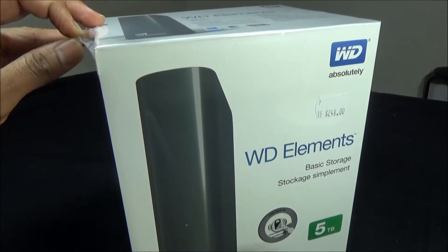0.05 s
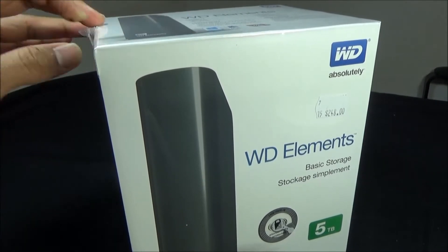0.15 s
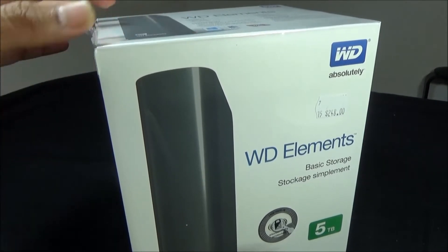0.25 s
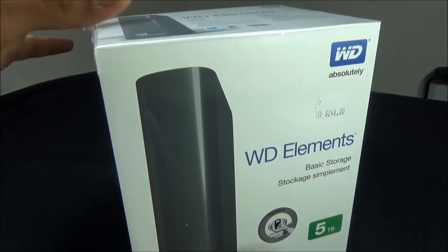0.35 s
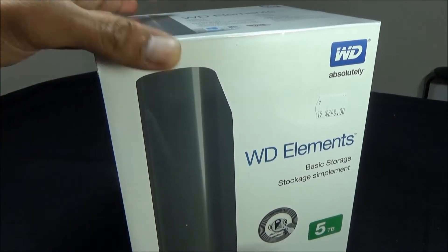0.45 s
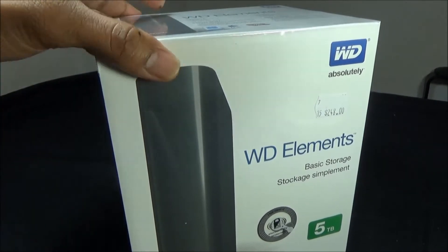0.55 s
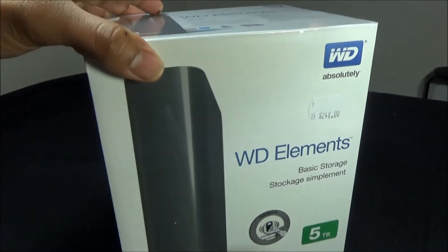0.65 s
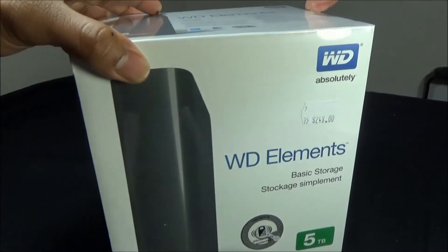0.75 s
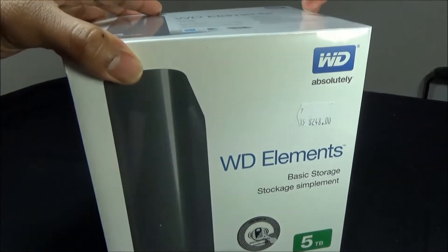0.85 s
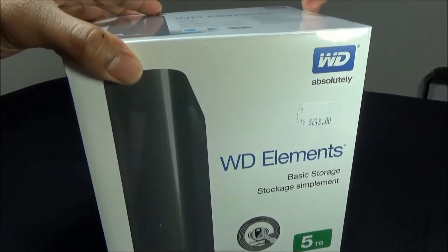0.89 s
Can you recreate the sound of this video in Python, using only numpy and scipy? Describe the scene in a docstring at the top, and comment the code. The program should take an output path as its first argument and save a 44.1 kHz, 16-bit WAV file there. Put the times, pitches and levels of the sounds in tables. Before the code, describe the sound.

A craft knife slider ratchets through about six sharp, quick clicks from 0.2 to 0.4 seconds, after a soft rub and bump. Hands slide over a plastic-wrapped cardboard box, which knocks hollowly at 0.6 seconds. Lighter bumps and plastic snaps follow until 0.9. Faint rustling and tiny squeaks lead to one more knock at 1.4 seconds. Everything is close, in a small room with faint hum and hiss.

```python
"""In a small room, close by, the slider of a craft knife is pulled back over six detents.
At each the blade chatters, seats and rings in its free modes. The knife is put down; hands slide over a
film-wrapped cardboard box, grip it and rock it on a cloth-covered table. Impacts excite the damped modes
of the box, while friction makes it rumble, scrape and groan, and the film hisses, squeaks and snaps.
Under it all lie a low hum, faint hiss and a very faint pulsing chirp."""
import sys
import numpy as np
from scipy import signal
from scipy.fft import rfft, irfft
from scipy.io import wavfile
from scipy.ndimage import uniform_filter1d

SR = 44100
rng = np.random.default_rng(int(sys.argv[2]) if len(sys.argv) > 2 else 0)


def wav_out(sig):
    """Save sig, one row per channel (or a flat mono array), as 16-bit PCM at SR to the path in sys.argv[1]."""
    wavfile.write(sys.argv[1], SR, np.round(np.clip(np.atleast_2d(sig).T, -1, 1) * 32767).astype(np.int16))


N = 74970

# spectrum of the room air: f/Hz, level/dB
AIR_SPECTRUM = [(20, -17.5), (55, 6), (110, -1.5), (200, -10.5), (1200, -9), (2500, -16.5), (5000, -19),
                (10000, -27), (16000, -23.5)]
# left-right coherence of hiss and rubbing: f/Hz, coherence (0-1)
HISS_COHERENCE = [(100, 1), (400, 0.91), (1000, 0.39), (2500, 0.52), (5000, 0.72), (8500, 0.87), (11000, 1),
                  (15000, 0.99)]
# reverberation bands: f/Hz, T60/s, level/dB, left-right coherence (0-1)
ROOM_BANDS = [(101, 0.39, -1, 0.99), (378, 0.32, -1.5, 0.96), (960, 0.29, 3.5, 0.97), (2470, 0.32, 2, 0.73),
              (5000, 0.3, 4.5, 0.67), (8300, 0.28, 1, 0.72), (13200, 0.23, 1.5, 1)]
# lingering resonances of table and room: f/Hz, T60/s, level/dB
TABLE_MODES = [(384, 0.41, -54.5), (560, 0.18, -58), (820, 0.17, -48.5)]

# friction of the box on hand and cloth: t/s, rumble level/dB, scrape level/dB
RUB_LEVELS = [(0, -39.5, -46), (.08, -41.5, -43), (.14, -48.5, -50.5), (.3, -55, -60.5),
              (.39, -58.5, -56.5), (.44, -47, -51), (.51, -50, -46), (.56, -50, -42.5), (.62, -52, -38.5),
              (.7, -46.5, -52.5), (.82, -52, -44), (.92, -60, -59.5), (1, -62.5, -61), (1.37, -62, -74.5),
              (1.46, -55, -51.5), (1.56, -57.5, -60.5), (1.64, -58.5, -52), (1.7, -58, -77)]
# rumble of the hollow box: f/Hz, level/dB
RUMBLE_SPECTRUM = [(30, -43), (80, -5.5), (130, -1), (200, 3), (300, -6), (700, -48), (16000, -80)]
# scrape of the box: f/Hz, level/dB
SCRAPE_SPECTRUM = [(100, -10), (300, 1.5), (600, 2.5), (900, -6), (1700, -12.5), (3000, -12.5),
                   (16000, -50)]
# soft heaves of the table: t/s, duration/s, level/dB
TABLE_HEAVES = [(0, 0.23, -47), (0.37, 0.075, -45), (1.395, 0.17, -49.5), (1.54, 0.27, -47)]
# harmonics of the groan, fundamental first: level/dB
GROAN_HARMONICS = [3, -2.5, -6, -7.5]

# skin sliding on the film: t/s, level/dB
SLIDE_LEVELS = [(0, -42.5), (.07, -39.5), (.12, -45), (.19, -46.5), (.45, -47), (.54, -41.5), (.61, -37.5),
                (.68, -42.5), (.74, -53), (.9, -50), (.96, -55.5), (1.03, -49.5), (1.12, -53.5),
                (1.18, -50), (1.23, -58.5), (1.34, -59), (1.39, -45.5), (1.45, -54.5), (1.5, -51.5),
                (1.55, -58.5), (1.61, -62), (1.645, -54.5), (1.7, -67)]
# hiss of the film: f/Hz, level/dB
FILM_SPECTRUM = [(300, -25), (1200, -7), (2200, -2), (4500, -3), (7000, -3), (9500, 1), (11000, -3),
                 (12500, -11.5), (16000, -22)]
# snaps of the film: t/s, level/dB, centre f/Hz, time constant/s, relative hiss level/dB
FILM_SNAPS = [(0.052, -40, 4402, 0.0016, 12.5), (0.6005, -32.5, 5000, 0.0019, 7.5),
              (0.7264, -45, 3200, 0.0013, 5), (0.806, -45, 3200, 0.0019, -7),
              (0.8568, -25.5, 5350, 0.002, -0.5), (1.109, -46, 3670, 0.0032, 1),
              (1.4147, -36, 2770, 0.001, -3)]
# fingertip squeaks on the film: t/s, duration/s, f/Hz, relative half-width, level/dB
FILM_SQUEAKS = [(.99, .08, 13500, .16, -57), (1.147, .037, 5360, 0.073, -54),
                (1.35, 0.021, 2130, 0.018, -50.5), (1.361, 0.051, 4620, .06, -53),
                (1.384, 0.01, 3200, .14, -44)]

# modes of the box before the hand damps and retunes them: f/Hz, T60/s, level/dB
BOX_MODES = [(116, 0.12, -2), (183, 0.064, -6), (300, 0.023, -2.5), (372.7, 0.048, 0), (581.5, 0.073, -3.5),
             (672, 0.033, -1), (807, 0.032, -4), (1000, 0.037, -4), (1422, 0.042, -4), (1710, 0.032, -4),
             (1900, 0.034, -6), (2130, .025, -10)]
# dull crush of the card: f/Hz, level/dB
CRUSH_SPECTRUM = [(100, -10), (500, 1.5), (1950, -5), (2500, -9.5), (5000, -14), (16000, -56)]
# points at which the spectrum of a knock is given: f/Hz
KNOCK_BANDS = [120, 380, 555, 800, 1050, 1700]
# knocks on box and table: t/s, level/dB in each of the six KNOCK_BANDS, T60 ratio, frequency ratio,
# relative crush level/dB, gain into room and table/dB
BOX_KNOCKS = [(.088, -33, -55, -41, -52, -40, -27.5, 0.24, 1.02, 1, -3),
              (.1968, -43, -18, -20.5, -21, -23.5, -15, 0.34, 0.96, -3, -8.5),
              (.573, -32, -38, -25.5, -39, -50, -54, 0.27, 1.16, 1.5, 0),
              (.5808, -32, -15.5, -16.5, -14, -20.5, -14.5, 0.35, 1.02, -2.5, -2),
              (.588, -38, -39, -21.5, -18, -47, -33, 0.49, 1.09, -9.5, -1),
              (0.7203, -34, -20.5, -19.5, -34, -28, -40, 0.53, 0.986, -18, -14.5),
              (0.769, -54, -30.5, -30.5, -17.5, -25, -24.5, 0.53, 1.01, -13, -25),
              (0.7957, -30, -23.5, -29, -20, -35, -33, 0.67, 0.948, -4, -20),
              (.8059, -36, -20.5, -50, -36, -21.5, -42, 0.36, 0.98, -2.5, -27),
              (0.8585, -22.5, -26, -29, -41, -36, -39.5, 0.71, 1.064, 4, -10.5),
              (1.4149, -28, -13.5, -30.5, -16, -30, -31.5, 0.8, 1.053, -7, -10)]

# fixed modes of blade and handle: f/Hz, T60/s, level/dB
KNIFE_MODES = [(1593, 0.0063, -12.5), (2240, .012, -20.5), (2870, 0.0056, -18), (4656, 0.016, -6),
               (6110, 0.0066, -5), (7500, 0.011, -12), (9640, 0.0098, 1), (12500, 0.01, -2.5),
               (13400, .012, -19)]
# rattle of the blade in its track: f/Hz, level/dB
RATTLE_SPECTRUM = [(300, -32), (900, -18.5), (1300, -19), (1900, -7), (3500, -2), (6000, -1.5), (8000, 3),
                   (10500, 1.5), (13000, -2.5), (16000, -8.5)]
# part of the rattle that differs between left and right: f/Hz, gain/dB
RATTLE_SPREAD = [(500, -17), (2500, -2.5), (5000, -5), (9000, -4), (13000, -12.5)]
# slider clicks, two at the last detent: t/s, level/dB, chatter duration/s, seating delay/s, then
# f/Hz, level/dB for each of four modes set by the free length of blade (low, ping, upper, bright)
DETENT_CLICKS = [(0.2051, -16.5, 0.005, .0025, 2597, 0.5, 4330, -2, 7550, 1, 10370, 5.5),
                 (0.236, -17, 0.005, 0.0024, 2650, 3.5, 4055, 1.5, 7000, 0.5, 8420, 7),
                 (0.2659, -18, .0044, .0022, 2646, 6, 3990, -6, 7350, 0, 9380, 1),
                 (0.3001, -18, .0052, .0022, 2563, 3, 4250, 5.5, 7350, 6, 9020, 8),
                 (0.3339, -17, 0.0044, 0.00046, 2580, 4, 4225, 2.5, 10450, 6, 9030, 7.5),
                 (0.3925, -17, 0.00038, 0.00017, 2670, -25, 4300, -12, 8800, -6, 10400, -9),
                 (0.3978, -15.5, .0046, 0.0012, 2590, -2, 4220, -14, 8900, 4, 10570, 5.5)]
SLIDING_T60_S = (0.01, 0.018, 0.0039, 0.0039)  # of those four modes

TOP_HZ = 16000


def undb(db):
    """Amplitude ratio of a level in decibels."""
    return 10 ** (np.asarray(db) / 20)


def unit(x):
    """Normalisation to rms 1."""
    return x / np.sqrt(np.mean(x ** 2))


def since(start=0):
    """Seconds elapsed since an onset, 0 before it."""
    return np.maximum(np.arange(N) / SR - start, 0)


def swell(start, length):
    """Half-sine envelope."""
    return np.sin(np.pi * np.minimum(since(start) / length, 1))


def envelope(rows, column=1):
    """Amplitude over time, interpolated in decibels."""
    rows = np.array(rows)
    return undb(np.interp(since(), rows[:, 0], rows[:, column]))


def across(hz, rows, column=1):
    """Interpolation of a column over log frequency."""
    rows = np.array(rows)
    return np.interp(np.log(hz + 1), np.log(rows[:, 0]), rows[:, column])


def bins():
    """Frequencies of the spectrum in Hz."""
    return np.fft.rfftfreq(N, 1 / SR)


def colour(rows):
    """Magnitude response through points of f/Hz, level/dB."""
    return undb(across(bins(), rows))


def resonance(hz, half_width):
    """Lorentzian peak; centred on 0 Hz it is a low-pass."""
    return 1 / (1 + ((bins() - hz) / half_width) ** 2)


def filtered(x, gain):
    """Zero-phase filtering by a gain per frequency."""
    return irfft(rfft(x) * gain, N)


def noise(gain):
    """Spectrally shaped Gaussian noise of rms 1."""
    return unit(filtered(rng.standard_normal(N), gain))


def stereo_noise(gain, coherence=HISS_COHERENCE):
    """Partly coherent noise: sum and difference of two independent signals."""
    alike = np.clip(across(bins(), coherence, column=-1), 0, .999)
    mid = filtered(rng.standard_normal(N), gain * np.sqrt(1 + alike))
    side = filtered(rng.standard_normal(N), gain * np.sqrt(1 - alike))
    return unit(np.array([mid + side, mid - side]))


def decay(t, t60):
    """Exponential damping, 60 dB in t60 seconds."""
    return np.exp(-np.log(1000) * t / t60)


def mode(t, hz, t60):
    """Free vibration of a damped oscillator."""
    return np.sin(2 * np.pi * hz * t) * decay(t, t60)


def convolve(x, response):
    """Output of a linear system with the given impulse response."""
    return signal.fftconvolve(np.atleast_2d(x), np.atleast_2d(response))[:, :N]


def scatter(x, start, width_hz):
    """Radiation in all directions evens out fine peaks: a minimum-phase pulse of smoothed spectrum."""
    power = uniform_filter1d(np.abs(rfft(x)) ** 2, max(int(width_hz * N / SR), 1))
    cepstrum = irfft(np.log(np.maximum(power, 1e-9 * power.max())) / 2, N)
    causal = cepstrum * (1 + np.sign(np.fft.fftfreq(N)))
    return irfft(np.exp(rfft(causal) - 2j * np.pi * bins() * start), N)


def room(x):
    """Reverberation: a diffuse field decays exponentially, sooner in the treble."""
    t, build_s = since(0.00074), 0.00048
    diffuse = stereo_noise(bins() < TOP_HZ, ROOM_BANDS)
    log_centres = np.log([band[0] for band in ROOM_BANDS])
    tail = 0
    for k, (_, t60, db, _) in enumerate(ROOM_BANDS):
        band = np.interp(np.log(bins() + 1), log_centres, np.arange(len(ROOM_BANDS)) == k)
        tail += undb(db) * filtered(diffuse, band) * decay(t, t60)
    tail *= 1 - np.exp(-t / build_s)
    return convolve(x, unit(tail) / np.sqrt(N))


def background():
    """Superposition of broadband room air, a low hum and a faint, evenly pulsed tone."""
    hum_hz, chirp_hz = 52, 3200
    start, end, period_s, pulse_s = .8825, 1.34, .0401, 0.01
    t = since(start)
    pulses = np.sin(np.pi * np.minimum(t % period_s / pulse_s, 1)) * (since() < end)
    chirp = undb(-51) * pulses * np.sin(2 * np.pi * chirp_hz * t)
    hum = undb(-58) * np.sin(2 * np.pi * hum_hz * since())
    air = undb(-52.5) * stereo_noise(colour(AIR_SPECTRUM))
    return air + hum + chirp


def rubbing():
    """Sliding friction drives the hollow box with noise, and the table heaves under it."""
    rumble = envelope(RUB_LEVELS, column=1) * stereo_noise(colour(RUMBLE_SPECTRUM))
    scrape = envelope(RUB_LEVELS, column=2) * stereo_noise(colour(SCRAPE_SPECTRUM))
    heaves = sum(undb(db) * swell(start, length) for start, length, db in TABLE_HEAVES)
    return rumble + scrape + heaves * noise(resonance(hz=52, half_width=20) ** 2)


def groan():
    """Uneven stick-slip of a fingertip on the wrapped card; the pitch rises as it speeds up."""
    start, length = .41, .18
    base_hz, rise_hz_per_s, roughness = 135, 390, 0.062
    jitter = 1 + roughness * noise(resonance(0, 105))
    hz = (base_hz + rise_hz_per_s * since(start)) * jitter
    phase = 2 * np.pi * np.cumsum(hz) / SR
    slips = sum(undb(db) * np.sin(k * phase) for k, db in enumerate(GROAN_HARMONICS, 1))
    return undb(-42) * swell(start, length) * unit(slips)


def film():
    """The wrapping snaps in damped transients; friction of the fingers gives hiss and narrow squeaks."""
    snaps = 0
    for start, db, hz, decay_s, hiss_db in FILM_SNAPS:
        t = since(start)
        crack = noise(resonance(hz, 0.09 * hz) ** 2) + undb(hiss_db) * noise(colour(FILM_SPECTRUM))
        snaps += undb(db) * (t > 0) * np.exp(-t / decay_s) * crack
    grain = np.exp(0.13 * noise(resonance(0, 490)))
    slide = envelope(SLIDE_LEVELS) * grain * stereo_noise(colour(FILM_SPECTRUM))
    squeaks = sum(undb(db) * swell(start, length) * noise(resonance(hz, hz * width))
                  for start, length, hz, width, db in FILM_SQUEAKS)
    return snaps + undb(-44) * room(snaps) + slide + squeaks


def box_knocks():
    """Modal response: the point of impact weights the box's modes; the grip damps and retunes them."""
    contact_s, crush_s, scatter_hz = 0.00074, 0.002962, 320
    card_damping = undb(np.interp(bins(), [2060, 2450], [0, -5]))
    direct, to_room, to_table = 0, 0, 0
    for start, *levels, t60_ratio, pitch, crush_db, room_db in BOX_KNOCKS:
        t = since(start)
        spectrum = list(zip(KNOCK_BANDS, levels))
        ring = sum((-1) ** k * undb(db + across(hz, spectrum)) * mode(t, hz * pitch, t60 * t60_ratio)
                   for k, (hz, t60, db) in enumerate(BOX_MODES))
        crush = noise(colour(CRUSH_SPECTRUM) * colour(spectrum)) * np.exp(-t / crush_s)
        crush *= undb(crush_db + max(levels[1:]))
        attack = 1 - np.exp(-t / contact_s)
        blow = filtered((ring + crush) * attack, card_damping)
        direct += blow
        to_table += undb(room_db) * blow
        # the shorter the ring, the less tonal its echo
        to_room += undb(room_db) * scatter(blow, start + crush_s, scatter_hz * max(1 - t60_ratio, 0))
    table_response = sum(undb(db) * mode(since(), hz, t60) for hz, t60, db in TABLE_MODES)
    return direct + room(to_room) + convolve(to_table, table_response)


def blade_ring(t, chatter, hz, t60):
    """A driven mode builds up while the blade chatters, then decays freely."""
    build = convolve(chatter, decay(since()[:SR // 20], t60))[0]
    detune = 1 + .004 * rng.standard_normal()  # the modes shift as the blade slides
    cycles = hz * detune * t + rng.random()
    return unit(build * np.sin(2 * np.pi * cycles))


def knife():
    """Impact excitation: at each detent the blade chatters in its track, seats with a tick and rings."""
    release_s, seat_s = 0.00037, 0.00033
    rattle_db, seat_db, ring_db, room_db = 3, 8, -9.5, -6.5
    out = 0
    for start, db, length, seat_delay, *sliding in DETENT_CLICKS:
        t = since(start)
        chatter = (t > 0) * np.exp(-np.maximum(t - length, 0) / release_s)
        seat = undb(seat_db) * (t > seat_delay) * np.exp(-since(start + seat_delay) / seat_s)
        grain = np.exp(0.2 * noise(resonance(0, 1300)))
        impacts = (chatter * grain + seat) * rng.standard_normal((2, N))
        mid_rattle, side_rattle = filtered(impacts, colour(RATTLE_SPECTRUM))
        sliding_modes = list(zip(sliding[::2], SLIDING_T60_S, sliding[1::2]))
        click = undb(rattle_db) * unit(mid_rattle)
        for hz, t60, mode_db in KNIFE_MODES + sliding_modes:
            click += undb(ring_db + mode_db) * blade_ring(t, chatter, hz, t60)
        side = filtered(unit(side_rattle), colour(RATTLE_SPREAD))
        direct = np.array([click + side, click - side])
        # the hand moves, so each click has its own reflections
        reflections = undb(room_db) * room(scatter(click, start + length, width_hz=860))
        chatter_rms = np.sqrt(np.mean(chatter ** 2))
        out += undb(db) * chatter_rms * (direct + reflections)
    return out


def scene():
    """Linear superposition of the sound pressures of knife, box and room."""
    return knife() + box_knocks() + film() + rubbing() + groan() + background()


def record(dry):
    """Soft saturation rounds the highest peaks, and a steep low-pass limits the bandwidth."""
    low_pass = signal.ellip(10, .2, 80, TOP_HZ, fs=SR, output="sos")
    return signal.sosfilt(low_pass, np.tanh(dry))


dry = scene()
out = record(dry)
wav_out(out)
```